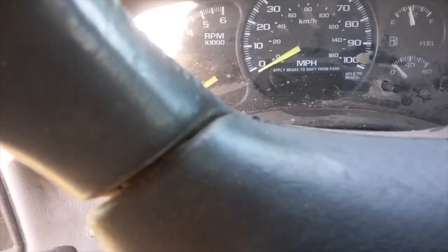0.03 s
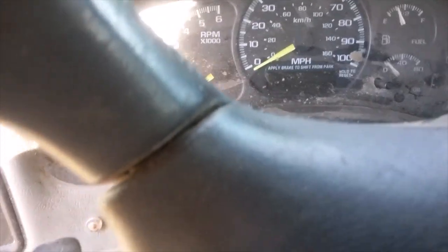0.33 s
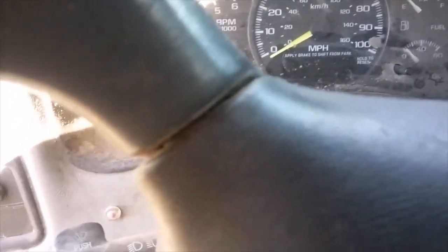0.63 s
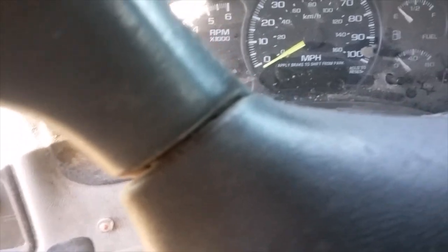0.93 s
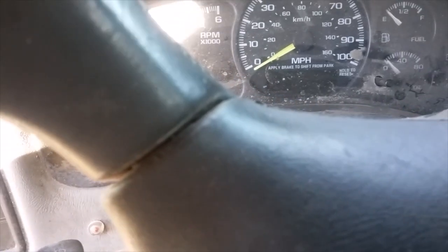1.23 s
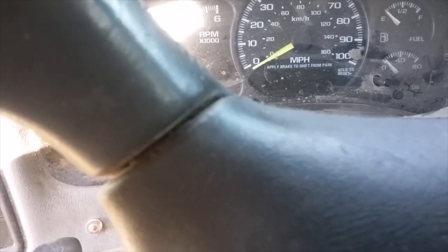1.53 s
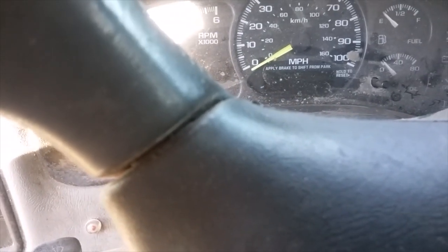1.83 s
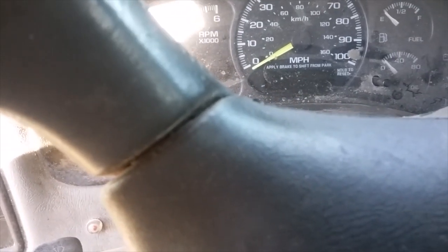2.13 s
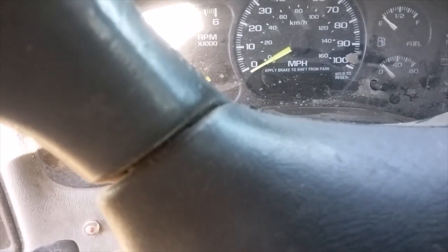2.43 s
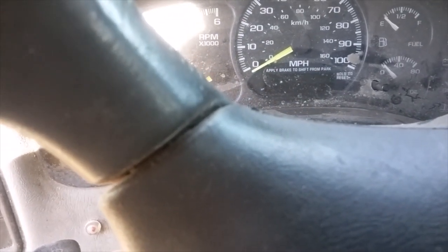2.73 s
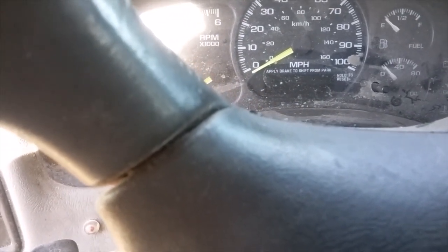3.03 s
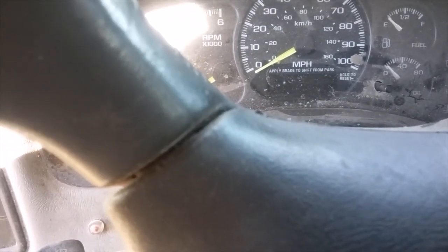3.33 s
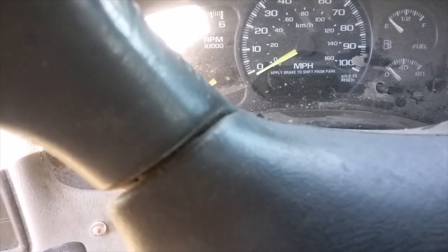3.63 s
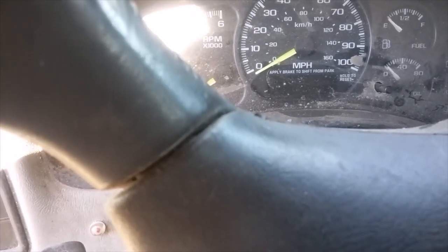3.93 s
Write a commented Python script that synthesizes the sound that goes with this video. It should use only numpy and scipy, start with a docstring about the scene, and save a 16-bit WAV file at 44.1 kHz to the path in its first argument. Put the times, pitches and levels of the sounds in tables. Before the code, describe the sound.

A starter clatters rapidly in three bursts without the engine catching, heard from a pickup's driver's seat. The ignition lock knocks around the pauses, and during the last try keys jingle and plastic snaps close by over a low rumble.

```python
"""Inside a pickup with a weak battery, the starter solenoid only chatters, about 19 strokes a second:
each a clack and rebound that rings the metalwork and booms in the cab. At 0.4 s the key is let go,
the ignition lock knocks and a faint whirr fills the pause. A second try opens with a slam at 0.8 s
and ends at 2 s. The third slams in at 2.8 s and chatters to the end, while close by the lock knocks,
its plastic shroud snaps and the keys jingle. Low rumble and quiet air lie underneath throughout."""
import sys
import numpy as np
from scipy import signal
from scipy.fft import rfft, irfft, next_fast_len
from scipy.io import wavfile
from scipy.ndimage import uniform_filter1d

SR = 44100
rng = np.random.default_rng(int(sys.argv[2]) if len(sys.argv) > 2 else 0)


def to_wav(s):
    """Save 16-bit WAV."""
    ch = np.atleast_2d(s).T  # columns
    pcm = np.round(np.clip(ch, -1, 1) * 32767)  # PCM
    wavfile.write(sys.argv[1], SR, pcm.astype(np.int16))


N = 176400

# tries of the starter (start [s], release [s], period [s], period lost per stroke [s], settling lag [s])
TRIES = [(-.0412, .39, .0588, .0006, 0), (.8134, 2.0, .0540, .00015, .0118),
         (2.815, 4.0, .0532, .0001, .009)]
# strength of each try (gain [dB])
TRY_GAINS = [0.03, 0.5, 1.52]
# one stroke: the clack, its rebound, the plunger sliding back (delay [s], attack [s], t60 [s])
IMPACTS = [(0, .0065, .062), (.0135, .003, .064), (.034, .006, .05)]
# strength of those three impacts (level [dB])
IMPACT_LEVELS = [-33, -33.5, -40]
# transmission through the bulkhead (frequency [Hz], gain [dB])
BULKHEAD_COLOUR = [(60, -2), (300, -17), (650, -7), (1000, -12), (1300, -1.5), (1900, -9.5), (2600, -8.5),
                   (3400, -7), (4000, -9), (4400, -15), (5400, -16.5), (7000, -28.5), (9000, -36),
                   (15000, -43.5)]
# resonances of the starter and its mounts (frequency [Hz], width [Hz], lift [dB])
STARTER_RESONANCES = [(320, 17, 9.5), (390.4, 28, 7), (535.4, 9.7, 12), (784.5, 47, 9), (1367, 35, 7),
                      (1432, 8.9, 10), (1573, 27, 2.5), (1629, 86, 12.5), (1909, 9.1, 9), (2070, 115, 9.5),
                      (2257, 157, 9.5), (2418, 66, 3.5), (2597, 230, 12.5), (2950, 72, 6.5),
                      (3850, 120, 7.5)]
# boom of the cab (frequency [Hz], gain [dB])
BOOM_COLOUR = [(20, -30), (55, 1.5), (100, -13), (140, 1), (240, 5.5), (330, 4.5), (450, -0.5), (600, -3),
               (1000, -4.5), (3000, -38.5), (9000, -50)]

# hard slams of the plunger (time [s], level [dB])
SLAMS = [(0.815, -29), (2.815, -28.5)]
# spectrum of a slam (frequency [Hz], gain [dB])
SLAM_COLOUR = [(80, -10), (400, -19.5), (800, 0.5), (1500, -12.5), (2700, -9), (4500, -9.5), (7000, -23.5),
               (10000, -39), (15000, -44)]
# resonances a slam excites (frequency [Hz], width [Hz], lift [dB])
SLAM_RESONANCES = [(756, 45, 0.5), (1710, 120, 7), (2670, 100, 9)]

# dull knocks of the lock (time [s], level [dB], t60 [s])
KNOCKS = [(0.395, -32.5, 0.14), (0.576, -45, 0.073), (0.68, -42, 0.09), (0.698, -42, 0.041),
          (.733, -47, 0.39), (2.009, -30, 0.069), (2.7636, -33, 0.096), (2.818, -34, 0.028),
          (2.843, -30, 0.12), (2.872, -31.5, 0.064), (2.895, -40, 0.14), (3.108, -27, 0.04)]
# spectrum of a knock (frequency [Hz], gain [dB])
LOCK_COLOUR = [(60, -2), (300, 0.5), (580, -4), (800, -1.5), (1100, -1), (2000, -6.5), (3300, -8.5),
               (5000, -19.5), (9000, -39), (15000, -62)]
# resonances of the lock (frequency [Hz], width [Hz], lift [dB])
LOCK_RESONANCES = [(725, 60, 10.5), (930, 89, 9), (1387, 33, 7.5), (2070, 140, 7.5)]

# contacts between keys (time [s], level [dB], brightest pitch [Hz])
CLINKS = [(.797, -41.5, 6300), (2.002, -38, 8240), (2.791, -34, 10800), (2.816, -37, 13000),
          (2.84, -26.5, 9900), (2.860, -40, 11000), (2.88, -39, 7540), (2.983, -34.5, 8300),
          (2.9963, -28, 8300), (3.0136, -19, 7400), (3.027, -24.5, 7800), (3.037, -26.5, 7540),
          (3.063, -37, 11800)]
# modes of the keys (frequency [Hz], level [dB], t60 [s])
KEY_MODES = [(6380, -9, 0.022), (7090, -12, 0.034), (7800, -14.5, .016), (9400, -19.5, 0.071),
             (11740, -13, 0.035), (14800, -17, .035)]
# scrape of key on key (frequency [Hz], gain [dB])
SCRAPE_COLOUR = [(3000, -39), (6000, 6), (7300, 4), (8600, 0), (10000, -10.5), (15000, -5)]

# snaps on the plastic shroud (time [s], level [dB])
SNAPS = [(0.852, -23), (0.8624, -25), (2.082, -45.5), (2.088, -41), (2.7576, -35), (2.7875, -31),
         (2.8149, -26), (2.8182, -39), (2.8388, -16.5), (2.8603, -32), (2.996, -23.5), (3.014, -12),
         (3.0173, -31), (3.0278, -20.5), (3.0878, -22.5), (3.11, -24.5)]
# spectrum of a snap (frequency [Hz], gain [dB])
SHROUD_COLOUR = [(200, -22), (1200, -8), (1700, -6), (3500, 3.5), (4300, -13.5), (5500, -11.5), (8300, -27),
                 (10000, -27.5), (15000, -46)]
# resonances of the shroud (frequency [Hz], width [Hz], lift [dB])
SHROUD_RESONANCES = [(1930, 280, 12), (2460, 360, 9), (3050, 290, 2), (5100, 220, 0.5)]

# spectrum of the whirr (frequency [Hz], gain [dB])
WHIRR_COLOUR = [(200, 10.5), (600, -5), (1000, 0), (2500, -15), (4100, -7), (5000, -21), (9000, -30)]
# peaks of the whirr (frequency [Hz], width [Hz], lift [dB])
WHIRR_RESONANCES = [(1584, 150, 14), (1915, 190, 21), (2350, 330, 18.5), (2860, 140, 18), (3350, 210, 12.5)]
# spectrum of the cab's rumble (frequency [Hz], gain [dB])
RUMBLE_COLOUR = [(25, -36), (50, -17.5), (75, 1.5), (95, 4.5), (125, -3), (200, -10.5), (400, -21),
                 (3000, -56)]
# envelope of the rumble (time [s], level [dB])
RUMBLE_ENVELOPE = [(0, -39.5), (.38, -41.5), (.48, -56), (.9, -45.5), (2.0, -48.5), (2.55, -55.5),
                   (2.72, -58.5), (2.9, -47.5), (4, -49.5)]
# quiet air in the cab (frequency [Hz], gain [dB])
AIR_COLOUR = [(40, -7), (200, -4), (450, -7), (1050, -0.5), (1900, -12), (5700, -20), (15500, -23.5)]

RING_SAMPLES = int(.25 * SR)  # length of one burst or clink


def solenoid():
    """Periodic impact excitation: the plunger repeats one clack, driving the metalwork and the cab."""
    loose_db, boom_db = -37, -40.5
    clack, metal, cab = np.zeros(RING_SAMPLES), np.zeros(N), np.zeros(N)
    for (delay, attack, t60), db in zip(IMPACTS, IMPACT_LEVELS):
        add(clack, delay, undb(db) * burst(attack, t60))
    repeated_boom = undb(-1.5) * burst(attack=.022, t60=.24)
    for start, gain in strokes():
        loose_parts = undb(loose_db) * burst(attack=.008, t60=.15, passes=0)  # rattle anew each stroke
        random_boom = burst(attack=.022, t60=.24, passes=0)
        add(metal, start, gain * (clack + loose_parts))
        add(cab, start, gain * (repeated_boom + random_boom))
    chatter = colour(metal, BULKHEAD_COLOUR, STARTER_RESONANCES)
    return chatter + undb(boom_db) * colour(cab, BOOM_COLOUR, STARTER_RESONANCES)


def strokes():
    """A quasi-periodic pulse train, (time [s], gain): after any settling lag it slowly quickens."""
    settle_strokes, scatter_db = .8, .5
    k = np.arange(24)
    pulses = []
    for (start, release, period, quicken, lag), db in zip(TRIES, TRY_GAINS):
        settling = lag * (1 - np.exp(-k / settle_strokes))
        times = start + period * k - quicken * k ** 2 / 2 + settling
        gains = undb(db + scatter_db * rng.standard_normal(len(k)))
        pulses += [(time, gain) for time, gain in zip(times, gains) if time < release]
    return pulses


def plunger_slams():
    """Impulsive excitation: after each pause the rested battery throws the plunger hard once."""
    force = np.zeros(N)
    for start, db in SLAMS:
        add(force, start, undb(db) * burst(attack=.004, t60=.14))
    return colour(force, SLAM_COLOUR, SLAM_RESONANCES)


def ignition_lock():
    """Damped resonance: the lock knocks dully as the key is turned and let go."""
    force = np.zeros(N)
    for start, db, t60 in KNOCKS:
        add(force, start, undb(db) * burst(attack=.004, t60=t60))
    return colour(force, LOCK_COLOUR, LOCK_RESONANCES)


def keys():
    """Modal vibration: each contact scrapes, then the keys ring, favouring modes near its pitch."""
    spread_octaves, detune, scatter_db = .3, .0071, 2
    scrape, jingle = np.zeros(N), np.zeros(N)
    t = np.arange(RING_SAMPLES) / SR
    for start, db, bright_hz in CLINKS:
        add(scrape, start, undb(db - 7) * burst(attack=0, t60=.02))
        for hz, mode_db, t60 in KEY_MODES:
            gain = undb(db + mode_db + scatter_db * rng.standard_normal())
            coupling = 1 / (1 + (np.log2(hz / bright_hz) / spread_octaves) ** 2)
            key_hz = hz * (1 + detune * rng.standard_normal())  # each key rings a little differently
            add(jingle, start, gain * coupling * np.sin(2 * np.pi * key_hz * t) * decay(t, t60))
    return colour(scrape, SCRAPE_COLOUR) + jingle


def shroud_snaps():
    """Impulse response: hard snaps ring the plastic shroud, and the cab adds a short reverberant tail."""
    force = np.zeros(N)
    for start, db in SNAPS:
        snap = burst(attack=0, t60=.013)
        tail = undb(-17) * burst(attack=0, t60=.1)
        add(force, start, undb(db) * (snap + tail))
    return colour(force, SHROUD_COLOUR, SHROUD_RESONANCES)


def whirr():
    """Resonant filtering: noise with a few treble peaks whirrs faintly through the first pause."""
    start_s, stop_s, fade_s = .33, .933, .032
    t = np.arange(N) / SR
    gate = np.clip(np.minimum(t - start_s, stop_s - t) / fade_s, 0, 1)
    return undb(-51.5) * gate * colour(rng.standard_normal(N), WHIRR_COLOUR, WHIRR_RESONANCES)


def cab_rumble():
    """Amplitude modulation: low noise in the cab swells with each try and sinks in the pauses."""
    level_db = np.interp(np.arange(N) / SR, *np.array(RUMBLE_ENVELOPE).T)
    return undb(level_db) * colour(rng.standard_normal(N), RUMBLE_COLOUR)


def cab_air():
    """Stationary noise: the air in the cab is a faint, even hush."""
    return undb(-62.5) * colour(rng.standard_normal(N), AIR_COLOUR)


def burst(attack, t60, passes=4):
    """A noise transient: linear rise, exponential decay; each pass evens it so it favours no pitch."""
    t = np.arange(RING_SAMPLES) / SR
    rise = np.minimum((t + 1 / SR) / max(attack, 1 / SR), 1)
    envelope = rise * decay(np.maximum(t - attack, 0), t60)
    grain = rng.standard_normal(len(t))
    for _ in range(passes):
        phase = np.angle(rfft(grain * envelope))
        white = irfft(np.exp(1j * phase), len(t))
        local_power = np.abs(uniform_filter1d(white ** 2, size=128))
        grain = white / np.sqrt(local_power + 1e-18)
    return grain * envelope


def colour(x, points, resonances=()):
    """Minimum-phase filtering by a broad curve plus resonance peaks; white noise keeps its level."""
    n = next_fast_len(N + N // 10, True) * 2
    f = np.maximum(np.arange(n // 2 + 1) * SR / n, 1)
    hz, db = np.array(points).T
    curve_db = np.interp(np.log(f), np.log(hz), db)
    for centre, width, lift in resonances:
        curve_db += lift / (1 + (2 * (f - centre) / width) ** 2)
    gain = undb(curve_db)
    gain /= np.sqrt(np.mean(gain ** 2))
    cepstrum = irfft(np.log(gain), n)
    cepstrum[1:n // 2] *= 2  # folded onto positive time, so ringing follows the blow
    cepstrum[n // 2 + 1:] = 0
    return irfft(rfft(x, n) * np.exp(rfft(cepstrum)), n)[:N]


def decay(t, t60):
    """Exponential damping: the level falls 60 dB in t60 seconds."""
    return np.exp(-np.log(1000) * t / t60)


def undb(db):
    """The decibel law: 20 dB is a factor of ten in amplitude."""
    return 10 ** (np.asarray(db) / 20)


def add(out, start, x):
    """Delay and sum: mix x into out from time start [s] on."""
    i = int(start * SR)
    x, i = x[max(-i, 0):], max(i, 0)
    out[i:i + len(x)] += x[:max(len(out) - i, 0)]


def scene():
    """Linear superposition: all sources add in one channel."""
    background = cab_rumble() + whirr() + cab_air()
    return (background + shroud_snaps() + keys() + ignition_lock() + plunger_slams() + solenoid())[None]


def record(dry):
    """Band limiting: a high-pass thins the deep bass and a steep low-pass cuts the top."""
    low_hz, top_hz = 46, 15900
    highpass = signal.butter(4, low_hz, "highpass", fs=SR, output="sos")
    lowpass = signal.ellip(10, .2, 70, top_hz, fs=SR, output="sos")
    return signal.sosfilt(lowpass, signal.sosfilt(highpass, dry))


dry = scene()
out = record(dry)
to_wav(out)
```